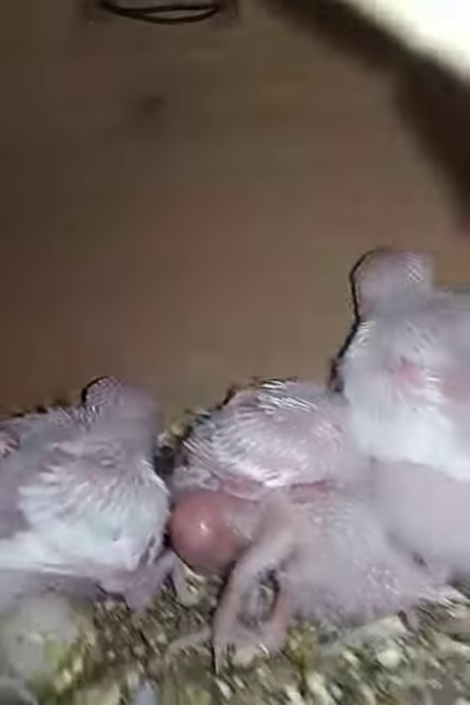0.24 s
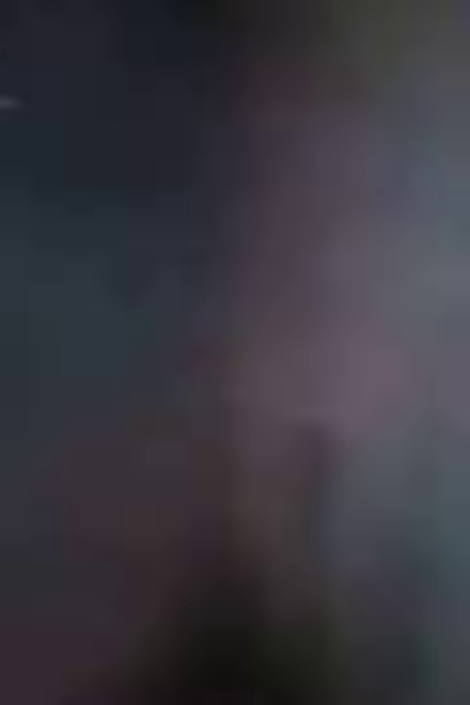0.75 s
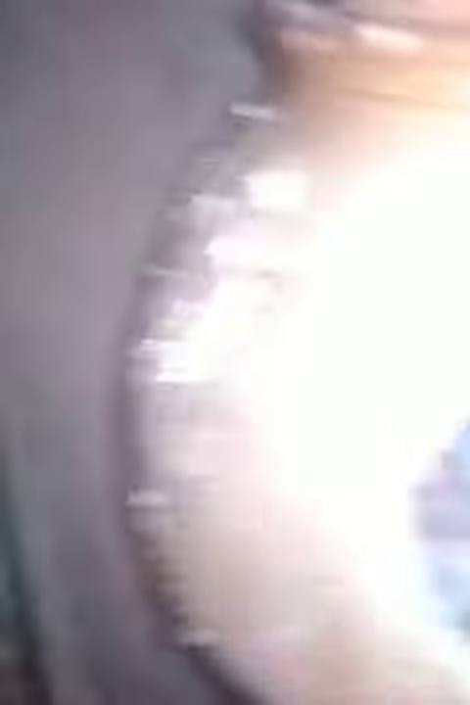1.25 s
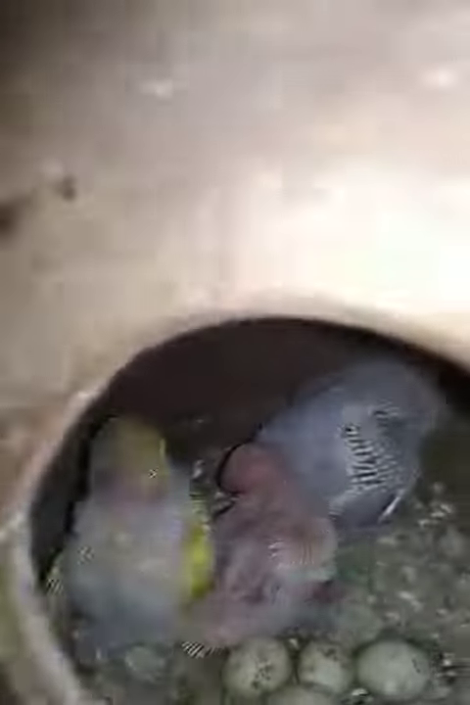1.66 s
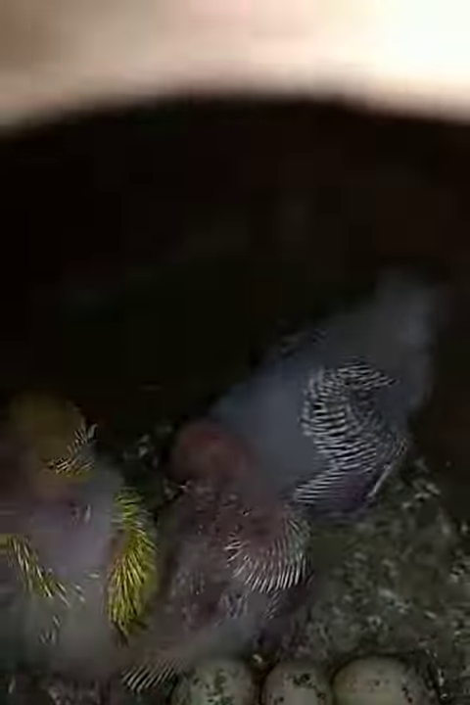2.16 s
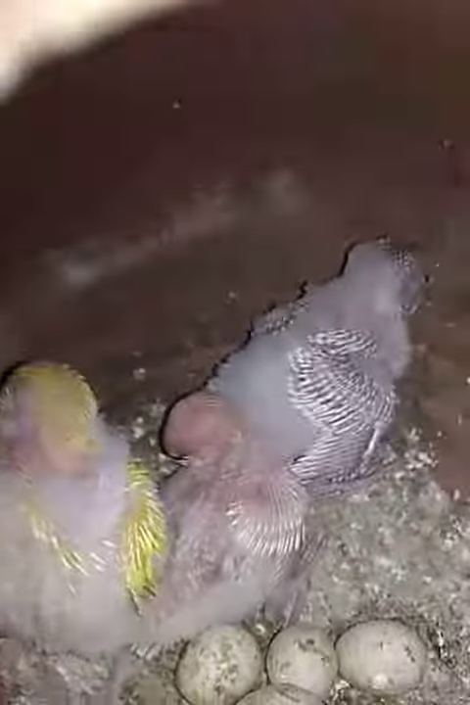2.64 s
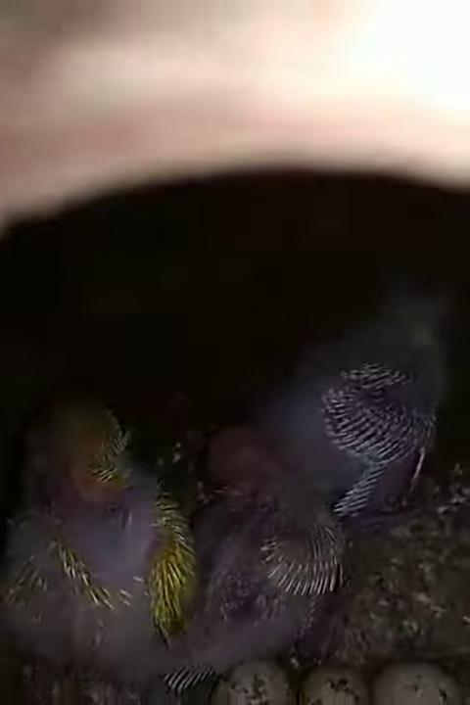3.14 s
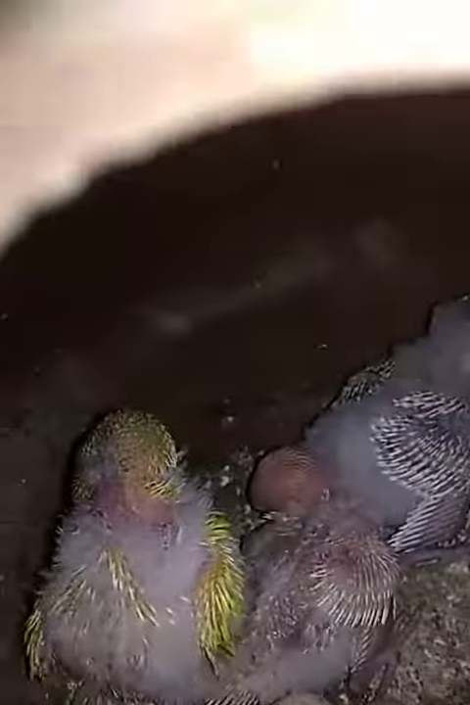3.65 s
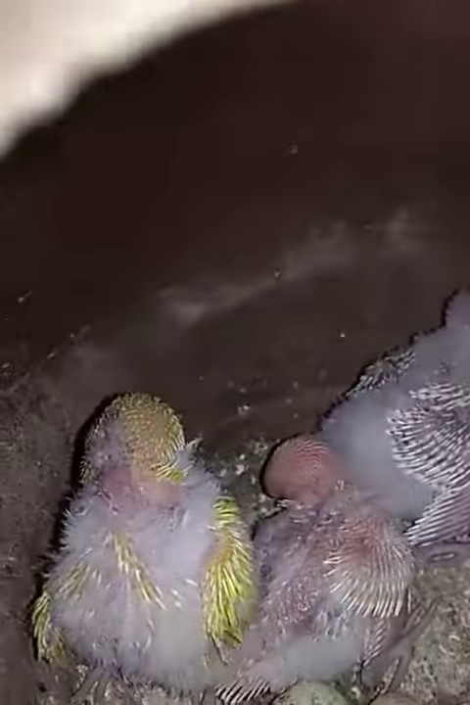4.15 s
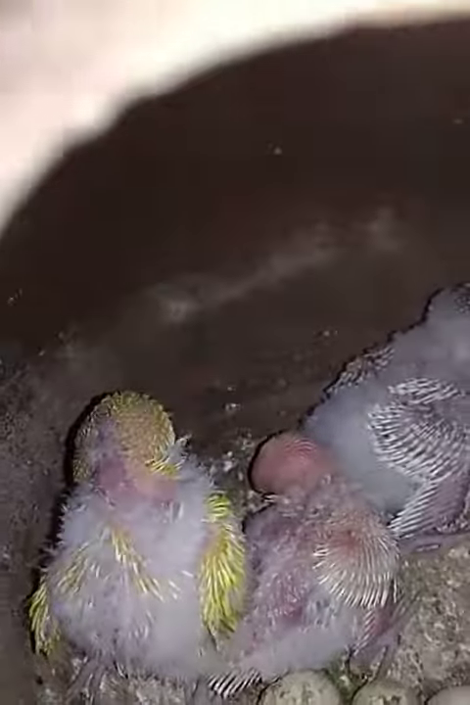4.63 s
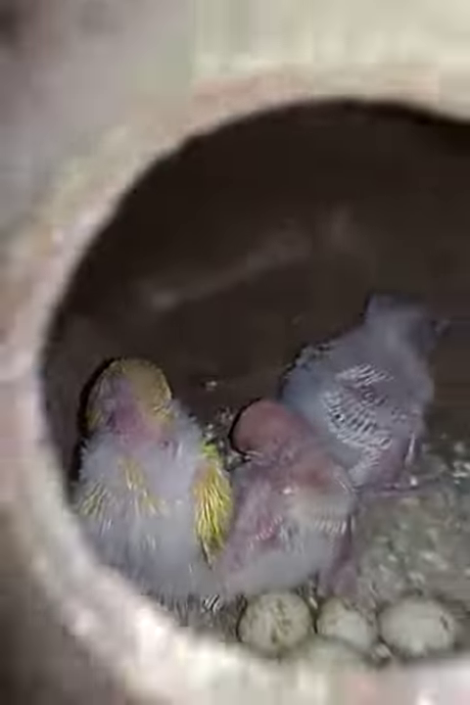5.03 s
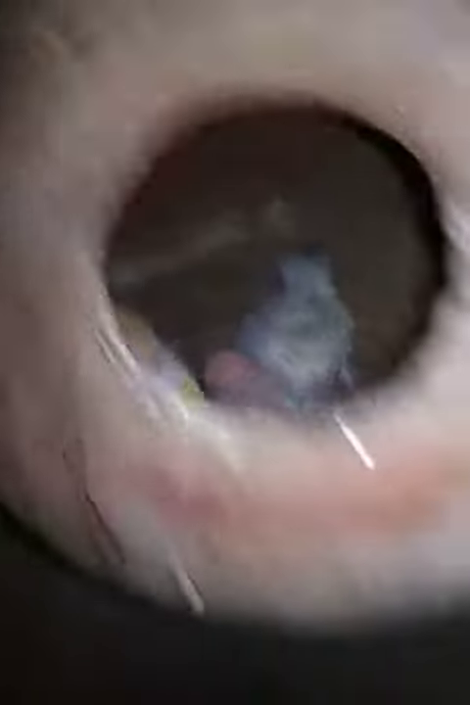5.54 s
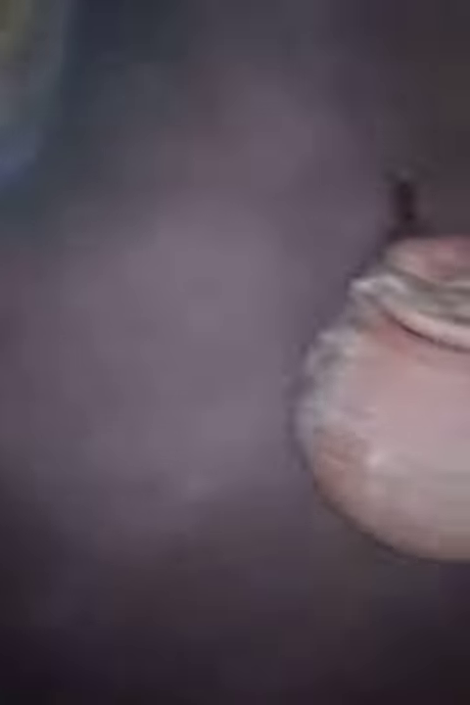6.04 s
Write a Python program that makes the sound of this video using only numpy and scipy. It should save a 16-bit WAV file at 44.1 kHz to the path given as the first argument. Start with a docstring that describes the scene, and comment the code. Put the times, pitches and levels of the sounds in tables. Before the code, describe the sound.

Close, hoarse cheeping and sizzling rasps from several baby parrots in a hard-walled pot, with faint scuffs, dull thuds and distant birds.

```python
"""A brief rasp and a rush of cheeps come first: parrot chicks begging inside a clay nest pot.
Cheeps are gliding tones roughened by pulsing and jitter; rasps are fluttering resonant noise with a squeak.
Decaying noise echoes from the hard walls smear every call, close to a phone held at the pot's mouth.
Below lie soft decaying bumps of the hand, scuffs on clay, faint birds further off,
the narrow-band hum of the pot's air resonance and a low outdoor rumble of shaped noise."""
import sys
import numpy as np
from scipy import signal
from scipy.fft import rfft, irfft, next_fast_len
from scipy.io import wavfile
from scipy.ndimage import uniform_filter1d, minimum_filter1d, map_coordinates

SR = 44100
rng = np.random.default_rng(int(sys.argv[2]) if len(sys.argv) > 2 else 0)


def generate_wav(signal):
    """Clip the signal to [-1, 1] and save it as 16-bit WAV at the path in sys.argv[1]."""
    frames = np.transpose(np.atleast_2d(signal))
    scaled = np.clip(frames, -1, 1) * 32767
    pcm = np.round(scaled).astype(np.int16)
    wavfile.write(sys.argv[1], SR, pcm)


N = 277389  # length [samples]
TOP_HZ = 15830  # upper band limit of the phone

# gliding cheeps: (time [s], length [s], start pitch [Hz], end pitch [Hz], level [dB])
CHEEP_CALLS = [(0, 0.038, 3180, 3926, -32), (0.024, 0.069, 2746, 2016, -43.5),
               (0.112, 0.03, 3735, 4120, -39.5), (0.136, .042, 4376, 4556, -32),
               (0.161, 0.1, 4240, 3470, -45.5), (0.301, .11, 3407, 2137, -52),
               (0.515, 0.065, 4110, 2524, -41.5), (.567, 0.042, 2578, 2760, -37.5),
               (.606, 0.034, 3120, 3320, -38.5), (.636, 0.042, 3600, 3960, -37.5),
               (0.903, 0.068, 3020, 2286, -52), (1.137, 0.076, 3190, 2230, -49.5),
               (1.219, 0.095, 4120, 3150, -51.5), (1.315, 0.0348, 3500, 3643, -42.5),
               (1.349, .065, 3600, 3347, -36.5), (1.419, 0.08, 3500, 2720, -43),
               (1.621, 0.058, 3090, 3370, -48), (1.676, 0.082, 3600, 3174, -41),
               (1.758, 0.13, 3160, 2572, -44.5), (1.96, 0.069, 3395, 3245, -52.5),
               (2.336, 0.051, 2328, 2490, -40.5), (2.393, 0.073, 2786, 3143, -38.5),
               (2.48, 0.088, 3310, 2643, -40.5), (2.579, 0.13, 3800, 2717, -43.5),
               (2.728, 0.07, 2500, 2270, -48), (2.808, 0.12, 3900, 2496, -45),
               (3.007, .089, 3420, 2540, -44), (3.163, 0.058, 3674, 4070, -43),
               (3.376, .085, 3543, 3100, -42), (3.431, 0.1, 2500, 2750, -50), (3.637, .12, 3257, 2640, -57),
               (3.94, 0.062, 3800, 3100, -53.5), (4.012, .11, 2334, 1860, -50),
               (4.086, 0.085, 2680, 3160, -42.5), (4.225, 0.076, 2630, 2125, -48),
               (4.325, 0.051, 3475, 3390, -43), (4.349, 0.027, 2590, 3230, -42),
               (4.375, 0.036, 3533, 3797, -36.5), (4.42, 0.085, 2280, 1723, -58),
               (4.515, 0.034, 2740, 2554, -62.5), (4.727, 0.059, 3285, 3596, -38.5),
               (4.824, 0.075, 3620, 3630, -54.5), (4.896, 0.17, 3643, 3147, -39.5),
               (4.909, 0.15, 2284, 2240, -45.5), (5.042, 0.059, 4020, 3400, -45),
               (5.134, 0.081, 2404, 2780, -42.5), (5.203, 0.061, 3243, 3200, -35.5),
               (5.27, 0.0705, 3370, 3050, -38.5), (5.36, .06, 3360, 2960, -36.5),
               (5.575, 0.053, 4130, 3590, -38), (5.645, 0.042, 2710, 3730, -38.5),
               (5.775, 0.068, 4080, 2890, -46), (5.9, 0.14, 3600, 3094, -49),
               (6.069, 0.068, 2530, 3430, -43), (6.251, 0.053, 3550, 3080, -43)]
# thin clear whistles: (time [s], length [s], pitch [Hz], level [dB])
WHISTLE_CALLS = [(1.37, 0.12, 5560, -45), (0.67, 0.047, 5330, -59), (4.085, 0.057, 5600, -45.5),
                 (4.787, 0.023, 5360, -40.5)]
# roughness of the briefest level cheep; it grows as the pitch falls and as the call lengthens
HOARSE, HOARSE_PER_OCTAVE, HOARSE_PER_S = 0.701, .7, 5
# overtone of a level cheep; rising cheeps are pressed harder and have a stronger overtone
OCTAVE_DB, OVERTONE_DB_PER_OCTAVE = -8, 8.5
WHISTLE_HOARSE, WHISTLE_OCTAVE_DB = 0.45, -12


def cheeps(lead_s=.012):
    """Voice tension: long falling cheeps are hoarse, short rising ones clearer and richer in overtones."""
    track = np.zeros((2, N))
    for s, length, start_hz, end_hz, db in CHEEP_CALLS:
        climb = np.log2(end_hz / start_hz)  # octaves
        hoarse = HOARSE - HOARSE_PER_OCTAVE * climb + HOARSE_PER_S * length
        octave_db = OCTAVE_DB + OVERTONE_DB_PER_OCTAVE * climb
        call = cheep(length, start_hz, end_hz, hoarse, octave_db)
        add(track, s - lead_s, at_level(pot(call), db, length))
    # the whistles do not glide
    for s, length, hz, db in WHISTLE_CALLS:
        call = cheep(length, hz, hz, WHISTLE_HOARSE, WHISTLE_OCTAVE_DB)
        add(track, s - lead_s, at_level(pot(call), db, length))
    return track


# loudest point of a level cheep as a share of its length; it moves towards the higher end
CREST, CREST_PER_OCTAVE = .55, 0.267


def cheep(length, start_hz, end_hz, hoarse, octave_db, waver=0.0252, noise_db=-12, beak_db=-6,
          third_db=-13, second_db=-11, rise=0.022, fall=0.075, arch_db=7, clear_width=0.0044):
    """Nonlinear oscillation: a jittered pulsing glide; at its crest the syrinx locks into a cleaner tone."""
    t = np.arange(SR // 5) / SR
    size = len(t)
    age = t - rise / 2
    glide = np.exp(np.interp(age, [0, length], np.log([start_hz, end_hz])))
    crest = np.clip(CREST + CREST_PER_OCTAVE * np.log2(end_hz / start_hz), 0, 1)
    clear = .9 * np.exp(-((age - crest * length) / clear_width) ** 2)
    rough = np.maximum(hoarse - clear, .12)

    jitter = .045 * wobble(1000, size)
    pitch = glide * (1 + rough * (jitter + waver * wobble(120.1, size)))
    phase = 2 * np.pi * np.cumsum(pitch) / SR
    third = amp(third_db) * np.sin(3 * phase) * (3 * glide < TOP_HZ)
    tone = np.sqrt(2) * np.sin(phase) + amp(octave_db) * (np.sin(2 * phase) + third)

    # the other side of the syrinx breaks in now and then, at a wandering pitch of its own
    other_hz = glide * np.exp(.17 * wobble(35, size))
    breaking_in = amp(11.0 * wobble(72.0, size))
    other_tone = np.sin(2 * np.pi * np.cumsum(other_hz * (1 + jitter / 2)) / SR)
    other = rough * amp(second_db) * unit(breaking_in * other_tone)

    # air leaking past the membranes hisses around the pitch and in the beak
    pitch_hiss = rough ** 2 * amp(noise_db) * band(np.sqrt(start_hz * end_hz), 2160, size)
    beak_hiss = rough * amp(octave_db + beak_db) * band(7670, 1070, size)
    husk = pitch_hiss + beak_hiss

    pulsing = flutter(rate_hz=250, scatter=0.2134, depth_db=12.0 * np.minimum(rough, 1), size=size)
    effort = amp(-arch_db * abs(age / length - crest) + 2.3 * wobble(75.0, size))
    voice = tone + other + husk + rough * chest(size)
    return swell(t, length, rise, fall) * effort * pulsing * voice


# harsh rasps: (time [s], length [s], level [dB], beak resonance [Hz], throat relative to beak [dB])
RASP_CALLS = [(0, 0.0055, -27.5, 6440, -2), (0.374, .1, -31, 6680, -18), (0.488, 0.1, -45, 6640, 2),
              (0.839, 0.044, -32, 6170, -6.5), (1.063, 0.053, -33, 6730, -7),
              (1.209, 0.046, -43.5, 7060, -3.5), (1.819, 0.058, -32.5, 6700, -7),
              (1.988, 0.075, -38, 6860, -5.5), (2.193, 0.033, -53, 7600, 5), (2.24, 0.055, -44, 6000, -5.5),
              (2.301, 0.046, -34, 6670, -7.5), (2.437, 0.088, -33, 6670, -7.5),
              (2.572, 0.079, -34.5, 6990, -11), (2.677, 0.061, -34, 6380, -11),
              (2.971, 0.12, -52.5, 6270, 1.5), (3.316, .052, -49.5, 6720, -3),
              (3.456, 0.043, -31.5, 6910, -8), (3.757, 0.14, -53, 6530, -6.5),
              (3.811, 0.059, -37.5, 6290, -7.5), (4.226, 0.077, -33, 6580, -14),
              (4.708, 0.0078, -35.5, 6220, -16), (4.88, 0.066, -36.5, 7050, -3),
              (5.052, 0.073, -31.5, 6510, -3), (5.247, 0.077, -33.5, 5870, -6.5),
              (5.333, 0.12, -31.5, 6400, -8.5), (5.488, .081, -32, 6650, -10),
              (5.585, .12, -44.5, 6080, -1), (5.729, 0.048, -51, 7670, 8), (5.911, 0.07, -34.5, 6810, -9),
              (5.986, 0.081, -44.5, 7300, 5.5), (6.115, .1, -32.5, 6870, -7),
              (6.255, 0.03, -44.5, 5600, -9)]
FULL_RASP_DB = -36.5  # level of a rasp with the beak wide open
SIZZLE_DB, SIZZLE_GROWS = -19.5, .3  # sizzle of a full rasp; dB more for each dB that a rasp is weaker


def rasps(beak_width_hz=2100, throat_hz=3900, rise=.028, fall=0.06, squeak_db=-3,
          sizzle_hz=11800, sizzle_width_hz=5000):
    """Source and filter: fluttering air sounds the throat and open beak, with a broken squeak in it."""
    track, t = np.zeros((2, N)), np.arange(SR // 5) / SR
    size = len(t)
    for s, length, db, beak_hz, throat_db in RASP_CALLS:
        weaker_db = FULL_RASP_DB - db
        beak = band(beak_hz, beak_width_hz, size) + amp(-13.0) * band(8400, 1800, size)
        pitch = beak_hz * (1 + .06 * wobble(60, size) + 0.0363 * wobble(1216, size))
        squeak = amp(squeak_db) * np.sqrt(2) * np.sin(2 * np.pi * np.cumsum(pitch) / SR)
        throat = amp(throat_db) * band(throat_hz, 3200, size)
        sizzle_gain = amp(SIZZLE_DB + SIZZLE_GROWS * weaker_db)
        sizzle = sizzle_gain * band(sizzle_hz, sizzle_width_hz, size)
        # the parts swell and sink on their own, so the colour shifts within the call
        voice = sum(part * amp(2.2 * wobble(55, size)) for part in (beak, squeak, throat))
        pulsing = flutter(rate_hz=250, scatter=0.352, depth_db=6.0, size=size)
        call = swell(t, length, rise, fall) * pulsing * (voice + sizzle + chest(size) / 2)
        add(track, s - rise / 2 + 0.0018, at_level(pot(call), db, length))
    return track


def flutter(rate_hz, scatter, depth_db, size):
    """Amplitude modulation: uneven pulsing of the syrinx, as a gain of rms 1."""
    cycles = np.cumsum(rate_hz * (1 + scatter * wobble(rate_hz, size))) / SR
    pulses = np.cos(2 * np.pi * cycles) + 0.12 * wobble(rate_hz, size)
    return unit(amp(depth_db * pulses))


def chest(size, chest_hz=1950, width_hz=520, chest_db=-21):
    """Tube resonance: the lowest mode of a chick's windpipe, stirred by any rough call."""
    return amp(chest_db) * band(chest_hz, width_hz, size)


def pot(call, walls_t60=0.064, tail_db=-1.0, tail_t60=0.22):
    """Reverberation: direct sound, dense wall echoes and a longer ring, drawn anew each time."""
    t = np.arange(SR // 3) / SR
    walls = unit(amp(-60 * t / walls_t60))
    tail = amp(tail_db) * unit(amp(-60 * t / tail_t60))
    answer = rng.standard_normal((2, len(t))) * np.hypot(walls, tail) / np.sqrt(len(t))
    answer[:, 0] += .3  # direct sound
    return signal.fftconvolve(call[None], unit(answer) / np.sqrt(len(t)), axes=1)


# soft bumps of the hand: (time [s], starting level of the decay [dB])
HAND_BUMPS = [(0.881, -45.5), (.977, -40), (1.686, -42), (2.337, -40.5), (2.408, -38), (2.49, -43),
              (2.828, -47), (2.948, -42), (4.065, -37.5), (4.318, -39.5), (4.989, -40), (5.159, -42.5)]
# knock of the pot, as the phone comes to rest on the rim: (time [s], level relative to the thud [dB])
KNOCK_LEVEL = [(2.4, -23.5), (5.1, -2.5)]


def bumps(thud_hz=42, decay=0.44, knock_hz=105, knock_t60=0.34):
    """Damped oscillation: the hand shifts on the phone, a few slow cycles and a dull knock each time."""
    track, t = np.zeros(N), np.arange(SR // 4) / SR
    for s, db in HAND_BUMPS:
        hz = thud_hz * np.exp(0.241 * rng.standard_normal())
        thud = amp(db - 60 * t / decay) * np.sin(2 * np.pi * hz * t)
        knock_db = db + np.interp(s, *np.transpose(KNOCK_LEVEL))
        knock = amp(knock_db - 60 * t / knock_t60) * band(knock_hz, 48, len(t))
        onset = 1 - np.exp(-t / 0.0029)
        add(track, s - .008, onset * (thud + knock))
    return track


# claws and hand scuffing the clay: (time [s], length [s], centre of the noise [Hz], level [dB])
CLAY_SCUFFS = [(0.014, 0.25, 380, -71), (1.302, 0.29, 740, -68), (1.615, 0.42, 513, -69),
               (2.945, .065, 800, -67), (3.41, .056, 400, -75), (3.574, 0.03, 905, -60),
               (3.622, 0.017, 470, -64), (4.977, 0.028, 454, -60)]


def scuffs(width_hz=350, grain_db=4):
    """Friction excitation: grainy rubbing sounds the clay wall as a band of noise."""
    track, t = np.zeros(N), np.arange(SR // 2) / SR
    for s, length, hz, db in CLAY_SCUFFS:
        grain = unit(amp(grain_db * wobble(76, len(t))))
        rub = grain * band(hz, width_hz, len(t))
        add(track, s, amp(db) * swell(t, length, rise=0.0054, fall=0.012) * rub)
    return track


# faint birds further off: (time [s], length [s], middle pitch [Hz], level [dB])
DISTANT_CALLS = [(.607, 0.08, 1150, -61), (1.197, 0.54, 1713, -65), (1.916, .1, 1703, -61),
                 (2.056, .045, 1990, -60), (2.96, 0.047, 1725, -59), (3.091, .14, 1510, -67),
                 (5.559, 0.18, 1195, -66.5), (6.162, 0.069, 1286, -67)]


def far_birds(waver=0.048, fading_db=4):
    """Frequency modulation and fading: distant wavering calls sink in pitch and come and go."""
    track, t = np.zeros(N), np.arange(SR * 3 // 4) / SR
    for s, length, hz, db in DISTANT_CALLS:
        sag = np.interp(t, [0, length], [1.05, .95])
        pitch = hz * sag * (1 + waver * (wobble(30.4, len(t)) + wobble(304.6, len(t))))
        fading = amp(fading_db * wobble(26.0, len(t)))
        tone = unit(fading * np.sin(2 * np.pi * np.cumsum(pitch) / SR))
        add(track, s, at_level(swell(t, length, rise=0.012, fall=0.035) * tone, db, length))
    return track


# spectral shape of the outdoor rumble: (frequency [Hz], relative density [dB per Hz])
RUMBLE_SPECTRUM = [(22, 3), (45, 2.5), (75, -4.5), (130, 0), (280, -17.5), (400, -15.5), (600, -23.5),
                   (1100, -24.5), (2500, -28.5), (5000, -44.5), (9000, -42), (15000, -64)]
# outdoor rumble: (time [s], level [dB])
RUMBLE_LEVEL = [(0, -54), (2.4, -55), (3.4, -56), (5.3, -56.5), (6.29, -57)]
# air resonance of the pot: (time [s], level before hum_db is added [dB])
HUM_LEVEL = [(0.0, -68), (0.54, -55.5), (1.21, -67.5), (2.37, -52.5), (2.71, -66.5), (5.13, -63),
             (5.76, -79), (6.29, -67)]


def background(pot_hz=168, hum_db=-1):
    """Cavity resonance: the air in the pot hums as narrow noise over a low, wide outdoor rumble."""
    t = np.arange(N) / SR
    noise = rng.standard_normal((2, N))
    common, side = filtered(noise, lambda f: amp(along(RUMBLE_SPECTRUM, f)))
    # the two channels differ more as the frequency rises
    side = filtered(side, lambda f: along([(60, 0.15), (150, 0.23), (400, 0.46), (1500, 0.84)], f))
    air = unit(np.array([common + side, common - side]) * amp(2.04 * wobble(14, N)))
    hum = unit(filtered(rng.standard_normal(N), lambda f: 1 / (1 + ((f - pot_hz) / 11) ** 2)))
    rumble = amp(np.interp(t, *np.transpose(RUMBLE_LEVEL))) * air
    return rumble + amp(hum_db + np.interp(t, *np.transpose(HUM_LEVEL))) * hum


def amp(db):
    """Logarithmic level: decibels to amplitude gain."""
    return 10 ** (np.asarray(db) / 20)


def unit(x):
    """Normalisation: x at rms 1."""
    return x / np.sqrt(np.mean(x ** 2) + 1e-20)


def along(points, hz):
    """Logarithmic frequency scale: (frequency [Hz], value) points read between by straight lines."""
    f, v = np.transpose(points)
    return np.interp(np.log(hz + 1), np.log(f), v)


def wobble(rate, size):
    """Slow random modulation: a smooth curve through random knots, rate of them a second."""
    knots = rng.standard_normal(512)
    return map_coordinates(knots, [np.arange(size) * rate / SR], order=2, mode="mirror")


def filtered(x, response):
    """Linear filtering: the spectrum of x times a response of frequency."""
    n = x.shape[-1]
    m = next_fast_len(n + 4096)
    return irfft(rfft(x, m) * response(np.fft.rfftfreq(m, 1 / SR)), m)[..., :n]


def band(centre_hz, width_hz, size):
    """Resonance: noise of rms 1 in one peak with steep skirts."""
    f = np.fft.rfftfreq(size, 1 / SR)
    response = 1 / (1 + ((f * f - centre_hz ** 2) / ((f + 1) * width_hz)) ** 2)
    return unit(irfft(rfft(rng.standard_normal(size)) * response, size))


def swell(t, length, rise, fall):
    """Envelope: smooth opening and closing, centred on the call's start (at rise / 2) and end."""
    opening = np.sin(np.pi / 2 * np.clip(t / rise, 0, 1)) ** 2
    closing = np.sin(np.pi / 2 * np.clip((length + rise / 2 - t) / fall + .5, 0, 1)) ** 2
    return opening * closing


def add(track, s, sound):
    """Superposition: mix a sound into the track at time s, cutting what falls outside."""
    start = round(s * SR)
    sound = sound[..., max(-start, 0):]
    part = track[..., max(start, 0):][..., :sound.shape[-1]]
    part += sound[..., :part.shape[-1]]


def at_level(sound, db, length):
    """Energy level: scale a call so that its total energy is 2 * length times the power at this level."""
    return sound * amp(db) * np.sqrt(2 * length * SR / (np.sum(sound ** 2) + 1e-20))


# balance of the channels: (frequency [Hz], left minus right [dB])
CHANNEL_BALANCE = [(40, 4.5), (150, 6), (500, 8.5), (2000, 6.5), (3500, 8), (6000, 9), (8000, 4),
                   (13000, -1)]


def sides(hz):
    """Level difference between channels: left and right gains at constant power."""
    ratio = amp(along(CHANNEL_BALANCE, hz))
    return np.array([ratio, np.ones_like(ratio)]) * np.sqrt(2 / (1 + ratio ** 2))


def scene(lowest_hz=1330):
    """Radiation: tiny bodies emit almost no low sound; the left side is louder below about 12 kHz."""
    chicks = filtered(cheeps() + rasps(), lambda hz: 1 - 1 / (1 + (hz / lowest_hz) ** 8))
    through_pot = pot(far_birds() + scuffs())[:, :N]
    return filtered(chicks + through_pot + background() + bumps(), sides)


def limited(x, ceiling_db=-16):
    """Peak limiting: the phone ducks both channels for some 20 ms around a peak above its ceiling."""
    need = np.minimum(1, amp(ceiling_db) / (abs(x).max(axis=0) + 1e-9))
    return x * uniform_filter1d(minimum_filter1d(need, size=441), size=441)


# colour of the phone's microphone: (frequency [Hz], gain [dB])
MICROPHONE_RESPONSE = [(1000, 1), (3500, 4), (4800, 3.5), (7000, 1), (9000, 6), (10300, 2), (11500, 0),
                       (15000, 2)]


def record(dry):
    """Transducer response: the phone colours the treble, holds down peaks and cuts above its band limit."""
    coloured = filtered(dry, lambda hz: amp(along(MICROPHONE_RESPONSE, hz)))
    return filtered(limited(coloured), lambda hz: hz < TOP_HZ)


dry = scene()
out = record(dry)
generate_wav(out)
```